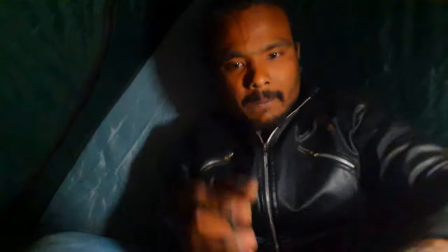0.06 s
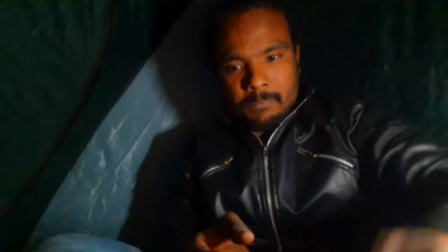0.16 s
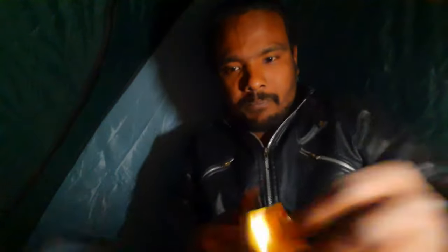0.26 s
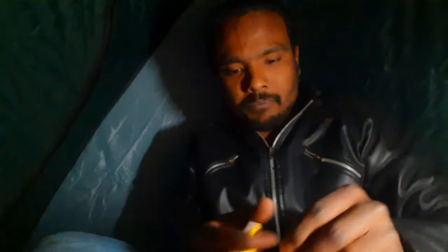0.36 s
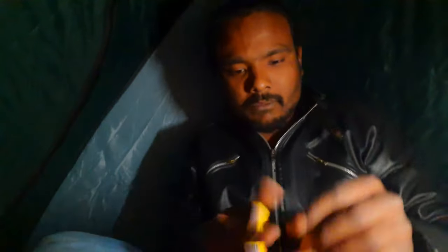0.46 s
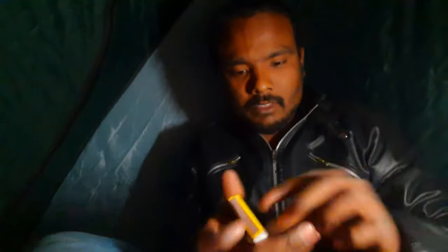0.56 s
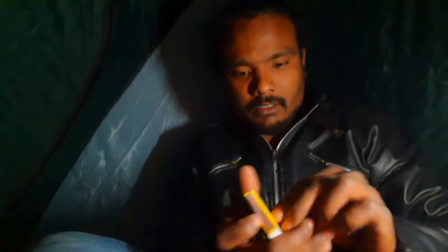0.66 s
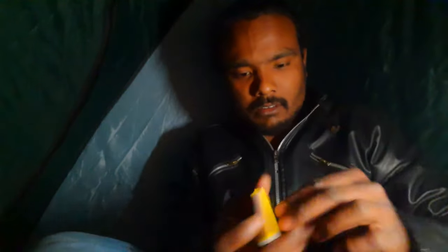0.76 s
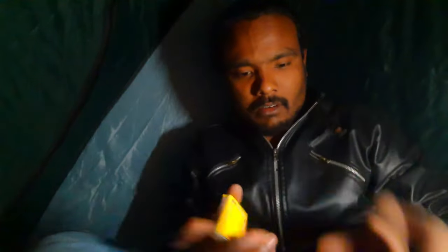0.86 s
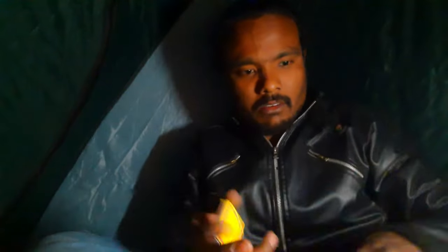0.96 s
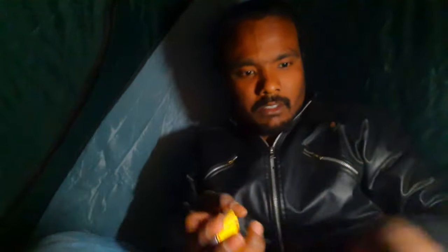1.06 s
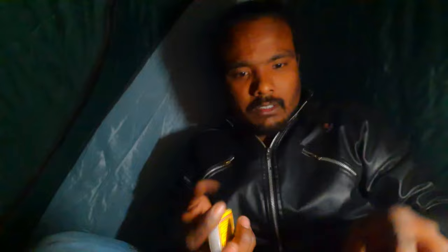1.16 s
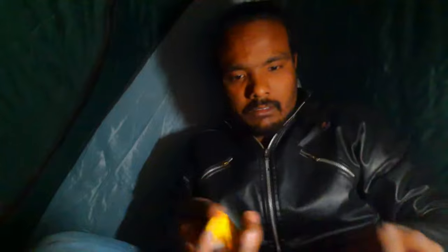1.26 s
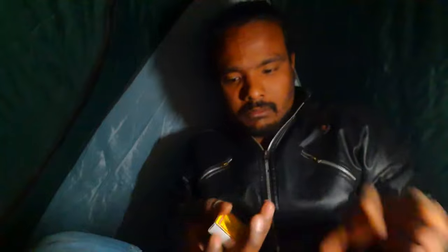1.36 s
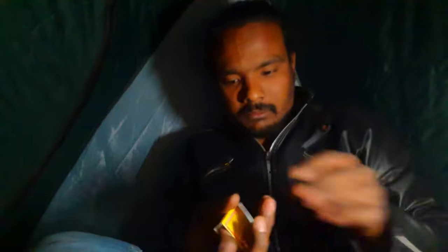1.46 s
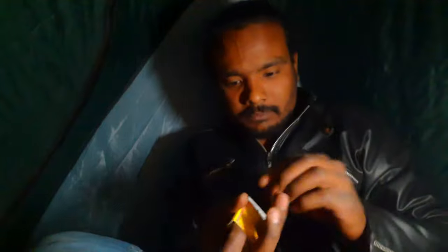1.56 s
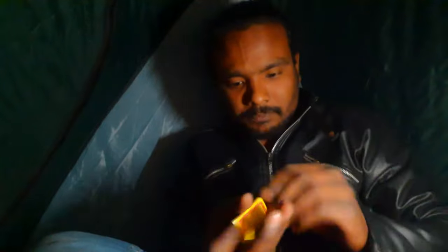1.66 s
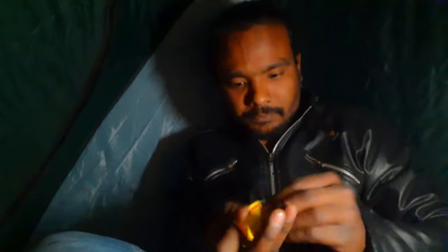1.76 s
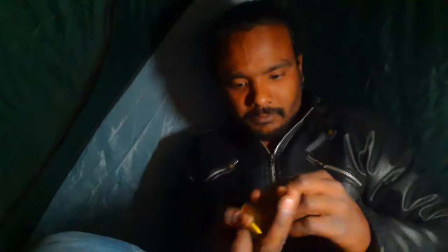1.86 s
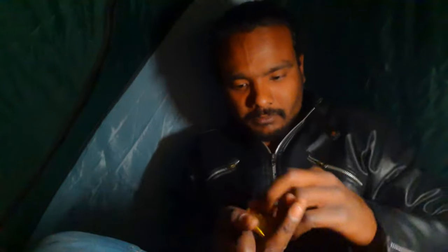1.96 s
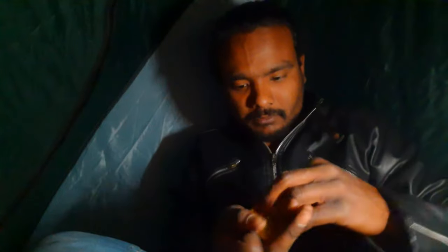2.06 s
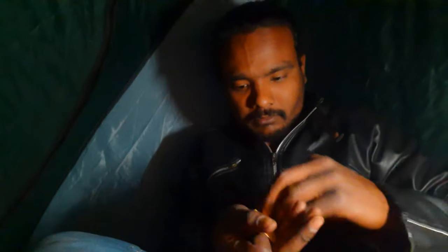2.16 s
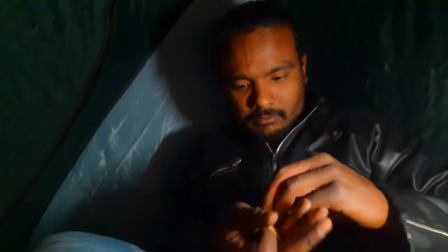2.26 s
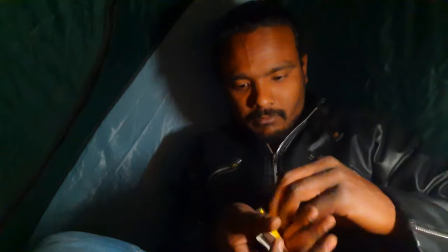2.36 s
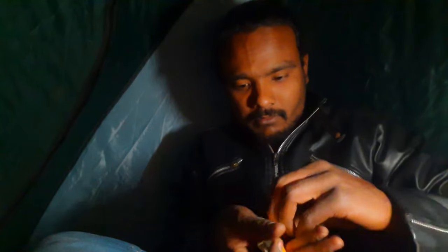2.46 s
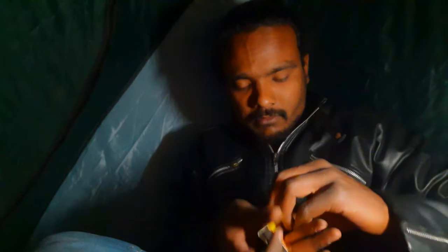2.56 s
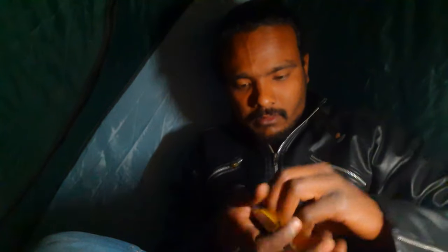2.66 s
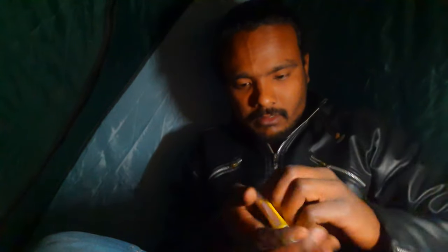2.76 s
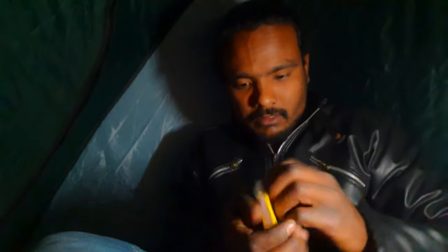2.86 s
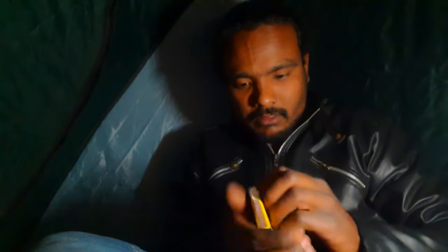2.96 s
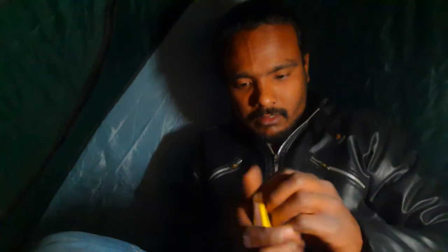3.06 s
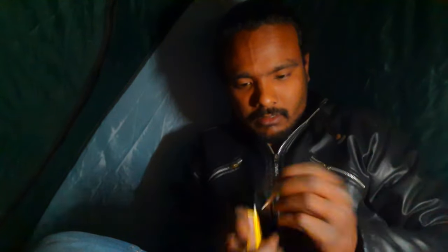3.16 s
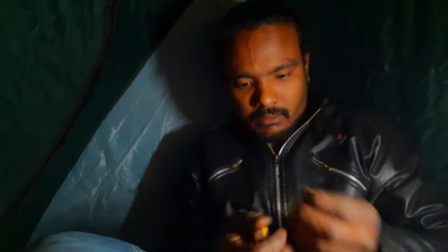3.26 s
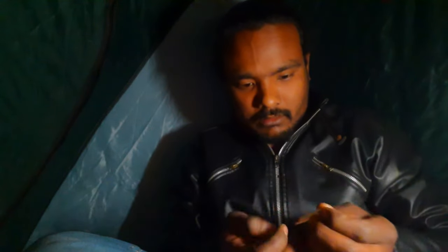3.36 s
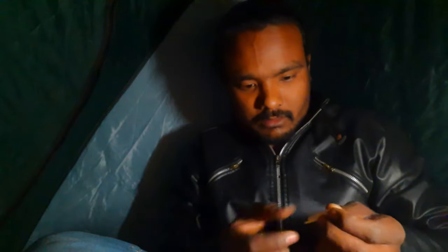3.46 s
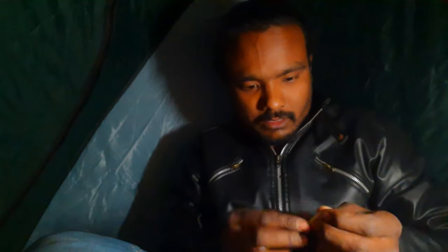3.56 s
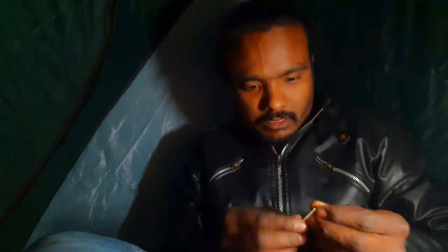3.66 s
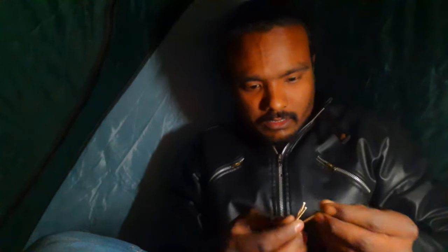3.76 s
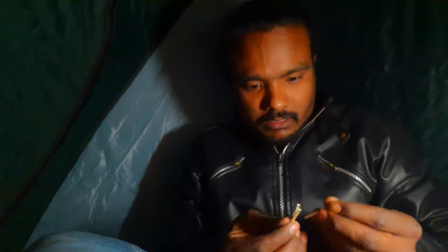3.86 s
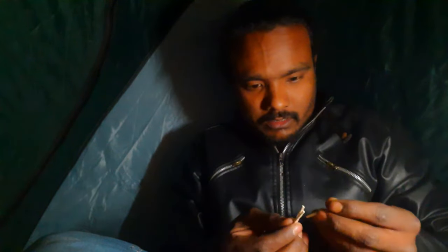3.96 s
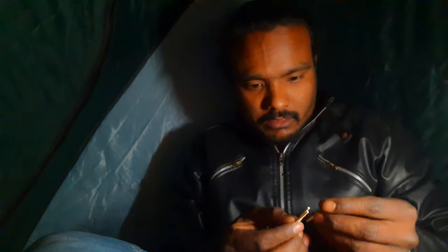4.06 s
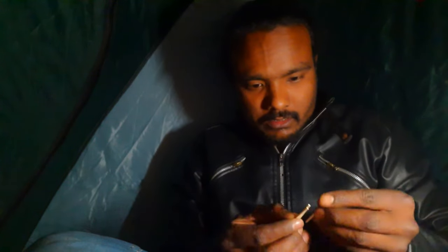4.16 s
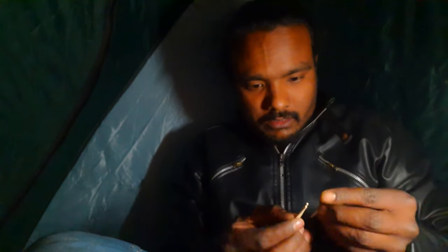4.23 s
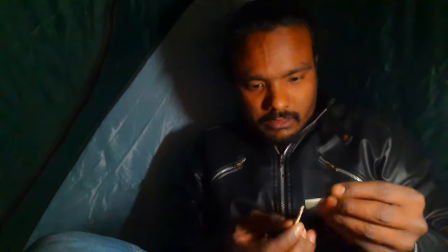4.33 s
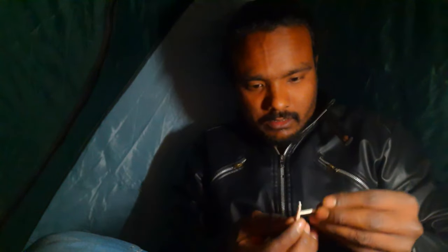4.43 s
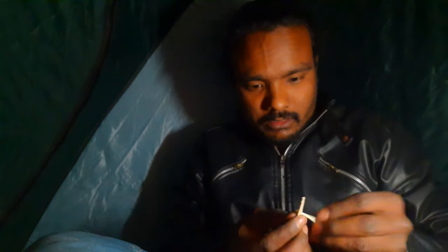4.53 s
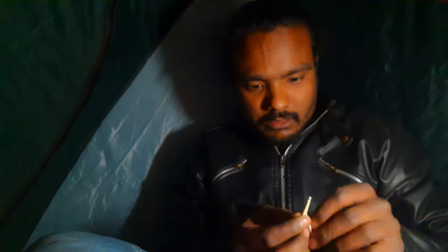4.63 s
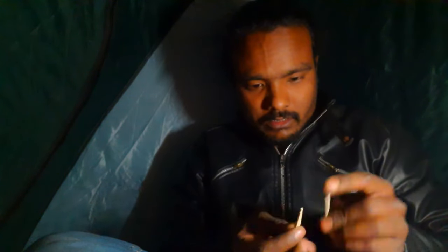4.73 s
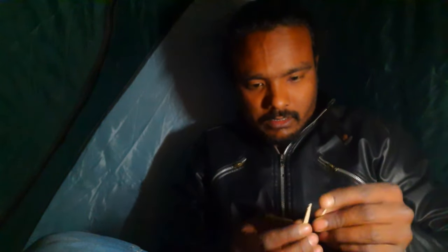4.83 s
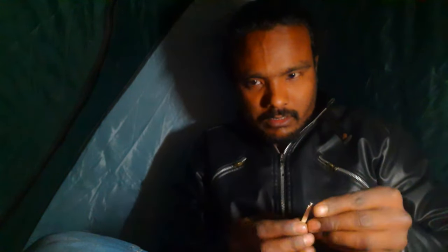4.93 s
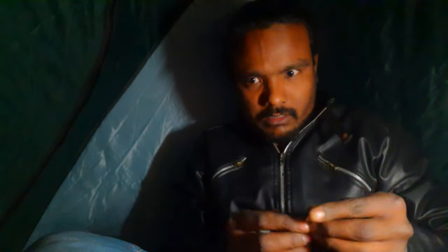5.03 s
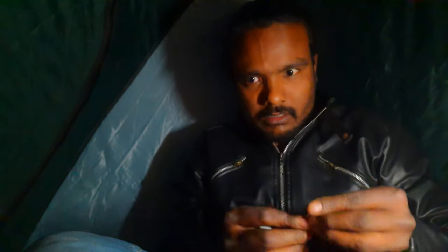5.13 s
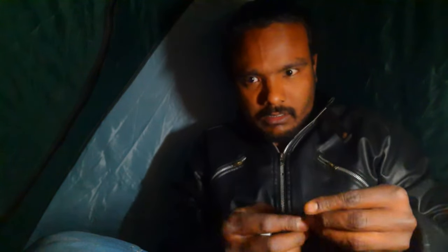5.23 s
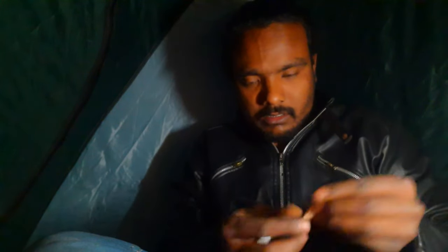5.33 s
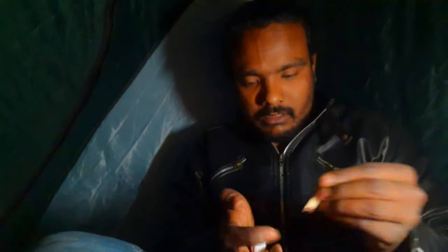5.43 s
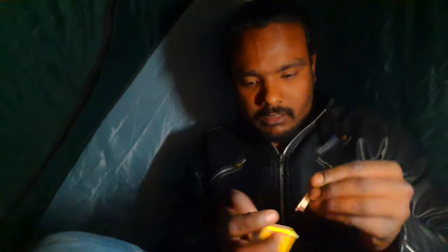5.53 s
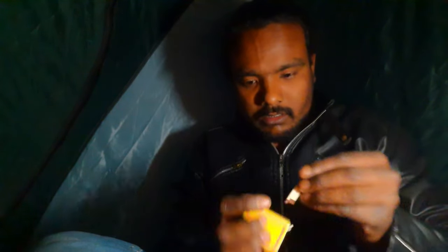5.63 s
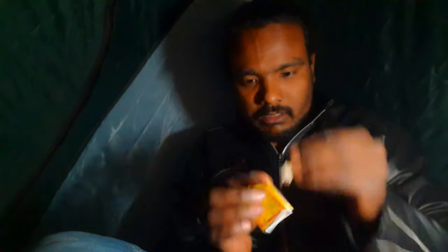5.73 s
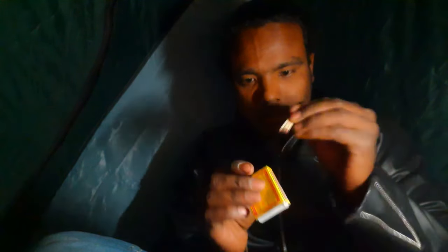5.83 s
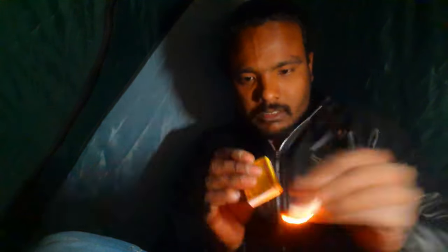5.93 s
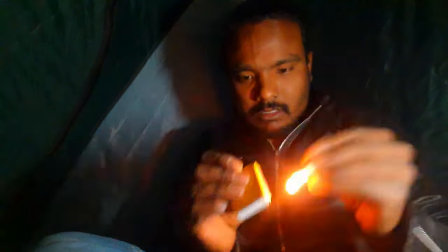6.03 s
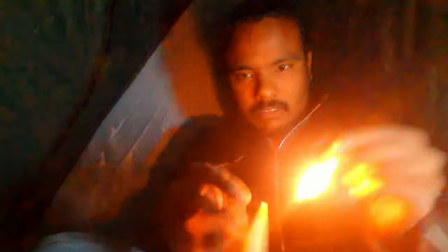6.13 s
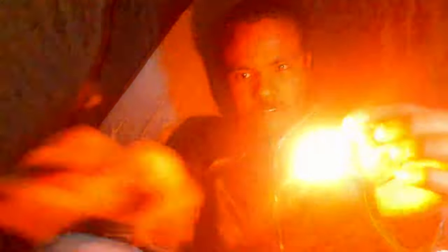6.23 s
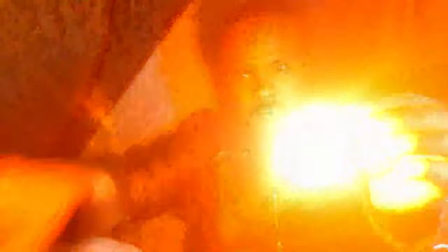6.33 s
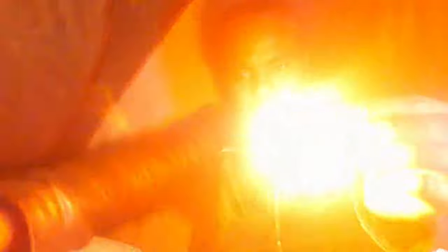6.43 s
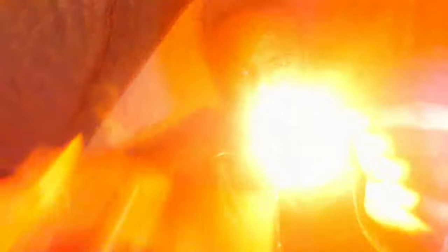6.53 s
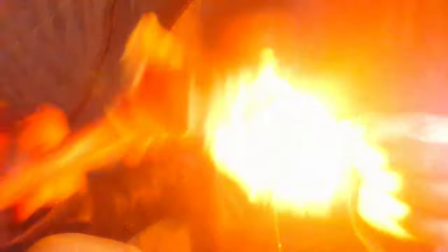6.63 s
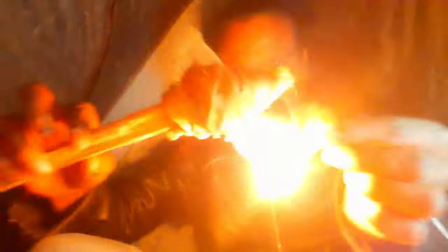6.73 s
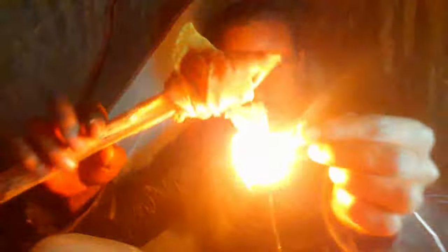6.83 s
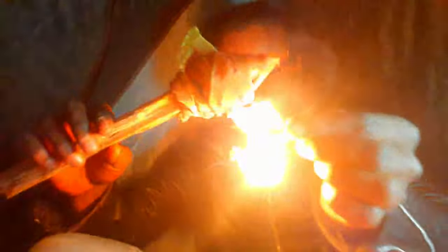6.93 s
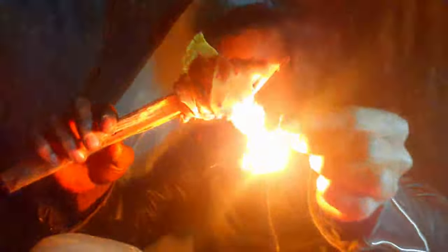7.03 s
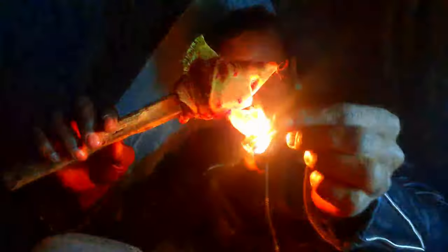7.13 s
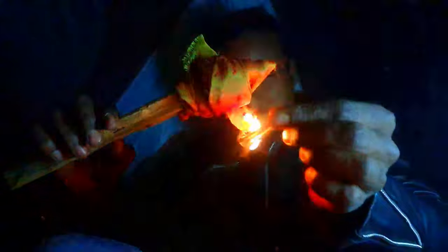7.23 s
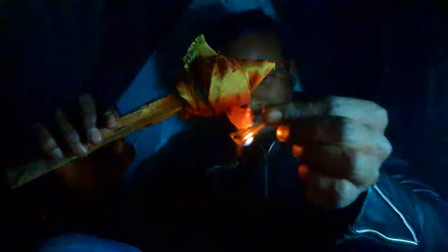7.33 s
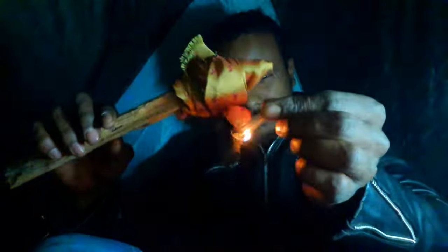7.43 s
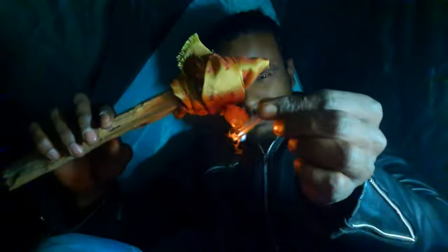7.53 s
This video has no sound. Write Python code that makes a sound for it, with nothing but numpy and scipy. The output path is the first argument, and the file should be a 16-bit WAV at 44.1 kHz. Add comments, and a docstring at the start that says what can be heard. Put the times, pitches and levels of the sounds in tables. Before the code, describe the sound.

Very close to a phone inside a small tent, hands fumble a cardboard matchbox: dry papery rustles, hollow taps, stick clicks and tray scrapes, with dull jacket rumble. After a near-silent pause with only faint low night air, the box is handled again, a match snaps along the striker and flares in an uneven hiss and soft roar, then cuts off into quiet.

```python
"""Matchbox in a tent at night

Inside a tent, hands close to a phone turn a cardboard matchbox and pick out matches.
Taps and scrapes are showers of tiny slips that ring the box; fingers and sleeves rustle as uneven noise.
A head is dragged along the striker and flares with a fluttering hiss and roar of shaped noise.
A low outdoor murmur of air lies under it all."""
import sys
import numpy as np
from scipy import signal
from scipy.fft import rfft, irfft, next_fast_len
from scipy.io import wavfile
from scipy.ndimage import uniform_filter1d

SR = 44100
rng = np.random.default_rng(int(sys.argv[2]) if len(sys.argv) > 2 else 0)


def store_wav(level_fs):
    """Save 16-bit WAV to argv[1]."""
    pcm = np.round(np.clip(np.atleast_2d(level_fs), -1, 1) * 32767)
    wavfile.write(sys.argv[1], SR, pcm.T.astype(np.int16))


N = 334719  # length in samples

SIDES = np.array([[1], [-1]])  # left and right port of the phone
# How alike nearby noise is at the two ports. Each row: frequency in Hz, likeness from 0 to 1.
NEAR_ALIKE = [(60, 0.73), (150, 0.98), (700, 0.87), (1500, 0.65), (4000, 0.31), (12000, 0.2)]
# The phone's case shades the treble. Each row: frequency in Hz, gain in dB.
CASE_SHADE = [(7900, -1), (9500, -19), (11000, -11.5), (15000, -8)]
# Hands in motion. Each row: time in seconds, level of fingers on card in dB, level of the jacket in dB,
# tightness of the grip from 0 to 1.
HANDS = [(0, -67.5, -63, .3), (0.15, -48, -42.5, .3), (0.45, -56, -54, .5), (0.56, -72, -63, .3),
         (0.9, -61, -61, .2), (1.05, -46.5, -46.5, .4), (1.3, -53.5, -56.5, .3), (1.5, -54.5, -46.5, .3),
         (1.7, -64, -57.5, .5), (2.0, -56.5, -60.5, .6), (2.3, -53, -58, .6), (2.6, -47, -70, .8),
         (2.9, -53, -56, .7), (3.3, -50, -57.5, .4), (3.6, -68.5, -69, .5), (3.9, -88, -80, .5),
         (5.4, -88, -80, .5), (5.55, -61, -75, .4), (5.96, -55.5, -76, .4)]


def undb(db):
    """Turns decibels into a plain gain."""
    return 10 ** (np.asarray(db) / 20)


def unit(x):
    """Scales a signal to rms 1."""
    return x / np.sqrt(np.mean(x ** 2))


def freqs(size):
    """Frequencies of a spectrum in Hz, kept at 1 or above."""
    return np.maximum(np.fft.rfftfreq(size, 1 / SR), 1.)


def on_log(table, hz):
    """Reads (Hz, value) points on a log-frequency axis."""
    f, v = np.transpose(table)
    return np.interp(np.log(hz), np.log(f), v)


def resonance(f, hz, width_hz):
    """Complex response of one damped mode, gain 1 at the centre."""
    return 1 / (1 + 1j * (f - hz * hz / f) / width_hz)


def curve(table):
    """Columns of timed rows at every sample; -200 (silent, for levels) outside the table."""
    t = np.arange(N) / SR
    s, *columns = np.transpose(table)
    return np.array([np.interp(t, s, c, -200, -200) for c in columns])


def walk(rate):
    """Random levels held 1 / rate seconds and smoothed twice; rms 1."""
    k = int(SR / rate)
    steps = np.repeat(rng.standard_normal(N // k + 1), k)
    return unit(uniform_filter1d(uniform_filter1d(steps, k), k)[:N])


def grains(shape, spread_db):
    """Dense tiny slips: noise in which a few slips are far larger than the rest."""
    return unit(rng.standard_normal(shape) * undb(spread_db * rng.exponential(size=shape)))


def wide_noise(spectrum, alike):
    """Coloured noise for two ports, as alike in each band as the table says."""
    size = next_fast_len(N)
    f = freqs(size)
    mid, side = rfft(rng.standard_normal((2, size)))
    c = np.clip(on_log(alike, f), 0, 1)
    pair = np.sqrt(1 + c) * mid + SIDES * np.sqrt(1 - c) * side
    return unit(irfft(pair * undb(on_log(spectrum, f)), size)[:, :N])


def through(x, response):
    """Filters a whole signal and sets it to rms 1."""
    size = next_fast_len(N)
    return unit(irfft(rfft(x, size) * response(freqs(size)), size)[..., :N])


def box(f, grip=0.97):
    """The card walls and hollow tray ring in several modes; a tighter grip raises them all."""
    # Each row: pitch in Hz before the grip scales it, width in Hz, strength in dB.
    modes = [(1274, 540, -13), (2220, 130, 7), (2684, 170, 1), (3376, 1350, -0.5), (5320, 500, -13.5),
             (8450, 610, -4)]
    response = 0
    for k, (hz, width_hz, db) in enumerate(modes):
        response = response + (-1) ** k * undb(db) * resonance(f, hz * grip, width_hz)
    return response


def treble(f, hz=8000):
    """The thin crackle of the contact itself: a broad bright hump."""
    return resonance(f, hz, 13000) ** 2


def night():
    """Distant air and the hiss of the phone: steady noise whose level drifts a little."""
    # Each row: frequency in Hz, strength in dB per Hz.
    spectrum = [(15, -43.5), (25, -18.5), (48, -4), (136, 0.5), (173, -9.5), (204, -4.5), (331, -5.5),
                (666, -22), (1490, -33), (1800, -32.5), (5730, -38.5), (7500, -34.5), (15500, -37.5)]
    # Each row: frequency in Hz, left-right likeness from 0 to 1.
    alike = [(60, 0.93), (200, 0.69), (700, 0), (3000, 0)]
    return wide_noise(spectrum, alike) * undb(-56.3 + 1.2 * walk(4.9))


def sleeves():
    """The jacket drags over itself with a dull, uneven rumble."""
    # Each row: frequency in Hz, strength in dB per Hz.
    spectrum = [(40, -7), (150, -9), (300, -2.5), (500, -7), (1000, -15.5), (4000, -52)]
    return wide_noise(spectrum, NEAR_ALIKE) * undb(curve(HANDS)[1] + 3.7 * walk(25))


def thumps():
    """A soft push through the floor rings one heavily damped low mode."""
    # Dull knocks. Each row: start in seconds, peak in dB, pitch in Hz, time to fade by 60 dB in seconds.
    knocks = [(1.168, -24.5, 85, 0.063), (1.389, -31.5, 46.4, 0.13), (1.459, -29.5, 114, 0.055),
              (2.161, -36, 430, 0.03), (3.238, -24.5, 420, 0.027), (5.981, -25.5, 356, 0.039),
              (6.32, -20, 61.9, 0.17)]
    out, t = np.zeros((2, N + SR)), np.arange(SR // 2) / SR
    for s, db, hz, t60 in knocks:
        # the lower the pitch, the further the two ports are out of step
        ring = np.sin(2 * np.pi * hz * t + SIDES * 40 / hz)
        fade = np.exp(-np.log(1000) * t / max(t60, .01))
        soft_start = 1 - np.exp(-t / 0.0042)
        ring *= fade * soft_start
        i = int(s * SR)
        out[:, i:i + len(t)] += undb(db) * ring / np.max(np.abs(ring))
    return out[:, :N]


def stirred():
    """Level of the fingers in dB: their steady motion plus rustle that lingers after each touch."""
    linger_db, settle_db_per_s = -25, 300  # level below the touch's peak, and how fast it dies
    t, power = np.arange(N) / SR, undb(curve(HANDS)[0]) ** 2
    for s, db, *_, breadth_db in touches():
        db -= max(breadth_db, 0)  # a bright crackle holds little of the box's own ring
        after = slice(int(s * SR), int((s + .3) * SR))
        power[after] += undb(db + linger_db - settle_db_per_s * (t[after] - s)) ** 2
    return 10 * np.log10(power)


def rustle():
    """Skin sticks and slips on the card in patches; the box rings with it as the grip shifts."""
    slips = grains((2, N), 2.7) * undb(2.5 * walk(60) + 3.5 * walk(350))
    shared = slips[0] + .5 * SIDES * slips[1]
    tight = np.clip(curve(HANDS)[2] + 0.4 * walk(11), 0, 1)
    loose_ring = through(shared * np.sqrt(1 - tight), box)
    tight_ring = through(shared * np.sqrt(tight), lambda f: box(f, 1.19))
    ring = (loose_ring + tight_ring) / np.sqrt(2)
    crackle = undb(1.5 + 1.7 * walk(15)) * through(slips, treble)
    return (ring + crackle) * undb(stirred())


def ticks():
    """A matchstick hits the tray once and rattles for a few milliseconds."""
    # Each row: start in seconds, peak in dB, ring in Hz.
    clicks = [(0.1245, -27.5, 2320), (0.1905, -24, 2180), (0.2857, -23, 1430), (0.4343, -15, 2620),
              (1.0296, -26.5, 3080), (2.361, -20, 2720), (2.611, -14, 2200), (2.658, -20, 2700),
              (3.024, -16, 2370), (3.0873, -25, 2490), (3.5469, -48, 4200), (5.4977, -33.5, 2330),
              (5.849, -41, 2090), (5.8738, -24, 2240), (5.8974, -29.5, 2650), (5.9724, -12, 4500),
              (5.9763, -1.5, 2440), (6.322, -24, 2640)]
    size = 2048
    out, t, f = np.zeros(N + size), np.arange(size) / SR, freqs(size)
    for slip, (s, db, hz) in zip(grains((len(clicks), size), 2.3), clicks):
        push = .3 * slip * np.exp(-t / 0.0014)
        push[0] += 2.5  # the first hit
        colour = 0.2 * box(f) + resonance(f, hz, 700) + 0.4 * treble(f)
        sound = irfft(rfft(push) * colour, size)
        i = int(s * SR)
        out[i:i + size] += undb(db) * sound / np.max(np.abs(sound))
    return out[:N]


def sputter(x):
    """Splits a sound into octave bands, each with its own flickering level."""
    bands = 250 * 2. ** np.arange(7)  # centres in Hz
    size = next_fast_len(N)
    whole, f = rfft(x, size), freqs(size)
    inside = np.clip(f, bands[0], bands[-1])
    out = 0
    for hz in bands:
        share = np.clip(1 - np.abs(np.log2(inside / hz)), 0, 1)
        out = out + irfft(whole * share, size)[:, :N] * undb(2.5 * walk(25))
    return out


def flare():
    """Gas jets hiss and spit from the head, the flame flutters below, a cupped hand hollows the hiss."""
    # The burning head. Each row: time in seconds, hiss level in dB, roar level in dB.
    levels = [(5.99, -33, -30), (6.025, -35, -41), (6.16, -32, -38), (6.25, -25, -32), (6.36, -27, -30),
              (6.47, -25, -31), (6.65, -33.5, -39), (6.83, -27.5, -30), (6.96, -30, -34),
              (7.05, -37.5, -44), (7.135, -36, -45), (7.158, -63, -52), (7.21, -80, -66)]
    # Both spectra, each row: frequency in Hz, strength in dB per Hz.
    hiss_spectrum = [(350, -17), (600, -9.5), (1200, -6.5), (2000, -7), (3200, -4.5), (6000, -8),
                     (7500, -5), (15000, -6.5)]
    roar_spectrum = [(15, -50.5), (25, -28), (64, -5.5), (135, 2.5), (177, -1.5), (356, 0), (750, -11),
                     (1200, -11), (1560, -16), (2640, -120)]
    hiss_db, roar_db = curve(levels)
    hiss = sputter(wide_noise(hiss_spectrum, NEAR_ALIKE))
    # the hand swallows a narrow band: open at -1, low band gone at 0, higher band gone at 1
    closing = np.interp(np.arange(N) / SR, (6.3, 6.5, 7.1), (-1, 0, 1))
    low_gone, high_gone = [through(hiss, lambda f: 1 - resonance(f, hz, 350)) for hz in (1850, 2150)]
    cupped = low_gone + np.clip(closing, 0, 1) * (high_gone - low_gone)
    hiss = cupped + np.clip(-closing, 0, 1) * (hiss - cupped)
    roar = wide_noise(roar_spectrum, NEAR_ALIKE)
    flutter = walk(30)  # shared by hiss and roar
    hiss_gain = undb(hiss_db + 0.93 * flutter + 1.4 * walk(250))
    roar_gain = undb(roar_db + 0.54 * flutter + 1.7 * walk(12) + 2.0 * walk(70))
    return hiss * hiss_gain + roar * roar_gain


def touches():
    """Every touch as (peak s, dB, rise s, fall s, ring Hz, breadth dB); all taps rise alike."""
    # Breadth is how far crackle and thud stand over the ring; rise and fall are times over 20 dB.
    # Abrupt touches on the box. Each row: peak time in seconds, peak rms level in dB,
    # fall in seconds (below 0.001, even negative, counts as 0.001), ring in Hz, breadth in dB.
    taps = [(0.287, -23.5, 0.06, 1460, -0.5), (0.380, -25, 0.014, 3600, -6),
            (0.7188, -41.5, 0.1, 1560, -10), (0.802, -41, 0, 1920, -19), (0.8395, -33, 0.04, 1860, -8),
            (1.166, -33, -0.05, 2170, 4), (1.1839, -26.5, 0.0079, 3000, -1), (1.56, -47, -0.04, 2550, -15),
            (1.7915, -35.5, -0.4, 2700, -8), (2.164, -35, 0, 3180, 6), (2.224, -42, -0.2, 2790, -4),
            (2.2673, -38, 0.2, 3400, -1.5), (2.403, -22, 0, 2670, -3), (2.4822, -10, -0.03, 2800, -12),
            (2.8208, -20.5, -0.06, 2660, -6.5), (2.844, -39.5, 0.3, 2730, -6.5),
            (2.8925, -26, 0.011, 2230, -10), (3.1931, -18.5, 0.03, 2030, -0.5),
            (4.647, -60.5, 0.02, 900, -10), (4.721, -64, 0.01, 1000, -10), (5.4059, -33, -0.02, 1090, 32),
            (5.4789, -50.5, 0.04, 2730, -1), (5.704, -38, -0.1, 2080, -8), (5.718, -33.5, 0.04, 1600, -5.5),
            (5.950, -40.5, -0.2, 2220, -9.5), (6.1905, -25, 0.01, 2440, -10), (6.323, -21, 0.022, 2270, -1),
            (7.3176, -52.5, 0.0048, 3080, 21)]
    # Scrapes, slides of the tray and the strike. Each row: peak time in seconds, peak rms level in dB,
    # rise in seconds, fall in seconds, ring in Hz, breadth in dB.
    scrapes = [(0.1474, -39, 0.018, 0.032, 2130, -2), (0.3359, -22, 0.017, 0.011, 2400, -2),
               (0.4433, -23.5, 0.016, 0.045, 2580, 1.5), (0.497, -40.5, 0.015, 0.046, 1200, -3.5),
               (0.6545, -45, 0.061, 0.027, 1870, -9), (0.692, -37, 0.006, 0.024, 1630, 2),
               (0.7412, -40, 0.017, 0.028, 2040, -1), (0.764, -38, 0.012, 0.062, 2460, -1),
               (0.875, -45.5, 0.032, 0.017, 2300, 0), (1.052, -31.5, 0.012, 0.029, 3000, 5),
               (1.1105, -37, 0.022, 0.016, 2310, -9), (1.24, -43.5, 0.092, 0.05, 2200, 3),
               (1.3444, -36, 0.031, 0.088, 2200, -0.5), (1.4006, -35.5, 0.011, 0.031, 2020, 3.5),
               (1.4546, -31.5, 0.0078, 0.027, 2420, 8), (1.5128, -36.5, 0.039, 0.033, 2000, 4),
               (1.6598, -43, 0.04, 0.025, 2580, -3), (1.6931, -42.5, 0.012, 0.0082, 2630, -16),
               (1.7738, -40.5, 0.027, 0.026, 2240, -7), (1.8543, -34, 0.052, 0.045, 2170, -2.5),
               (1.922, -43.5, 0.043, 0.015, 2570, -10), (2.0517, -38.5, 0.01, 0.016, 3130, 2),
               (2.1145, -38.5, 0.024, 0.085, 2830, 0.5), (2.3117, -30.5, 0.031, 0.0039, 2580, -1),
               (2.3816, -33, 0.021, 0.0051, 2680, -4.5), (2.472, -34, 0.02, 0.02, 2700, -3),
               (2.5436, -26, 0.0072, 0.0066, 2680, -6), (2.5639, -26, 0.027, 0.03, 3080, -6),
               (2.6623, -24.5, 0.032, 0.029, 2640, 1.5), (2.7288, -26.5, 0.034, 0.044, 2230, -5),
               (2.93, -34, 0.047, 0.13, 2600, -0.5), (3.0044, -33, 0.085, 0.0054, 2530, -1),
               (3.037, -24, 0.033, 0.0088, 2370, -5), (3.1112, -29.5, 0.055, 0.013, 2650, -2.5),
               (3.1552, -24.5, 0.0097, 0.088, 3500, 0), (3.2081, -20.5, 0.006, 0.047, 2010, -0.5),
               (3.2445, -20, 0.01, 0.005, 2060, 0), (3.409, -37.5, 0.043, 0.0071, 1900, -7),
               (3.4764, -34, 0.051, 0.013, 2780, -8), (3.6589, -51.5, 0.028, 0.045, 2020, 1),
               (3.7647, -49.5, 0.03, 0.03, 2670, 21), (4.7557, -63, 0.043, 0.017, 7500, 0),
               (5.5802, -31.5, 0.013, 0.0052, 2090, -7), (5.6268, -32.5, 0.035, 0.012, 3320, -2),
               (5.685, -40.5, 0.065, 0.021, 2300, -6), (5.761, -36.5, 0.038, 0.033, 2850, -6),
               (5.84, -31.5, 0.025, 0.02, 2590, -10), (5.9898, -15, 0.019, 0.016, 2100, 0.5)]
    tap_rise_s = 0.0035
    return [(s, db, tap_rise_s, *rest) for s, db, *rest in taps] + list(scrapes)


def contacts():
    """Each touch is a shower of slips that swells and dies, ringing box and grip; abrupt ones tick first."""
    size, lead = 8192, 3000  # samples per touch, and samples before its peak
    out, t, f = np.zeros((2, N + size)), (np.arange(size) - lead) / SR, freqs(size)
    rows = touches()
    # the hands are never twice in the same place
    slips, place = grains((len(rows), size), 3.34), rng.standard_normal((len(rows), 2))
    # the slips come in clumps a few milliseconds long
    clumps = np.repeat(rng.standard_normal((len(rows), size // 64)), 64, axis=1)
    slips *= undb(5 * uniform_filter1d(clumps, 192))
    for slip, (pan, spot), (s, db, rise, fall, hz, breadth_db) in zip(slips, place, rows):
        # the thud grows with breadth up to a ceiling
        thud_db = min(-10 + 1.1 * breadth_db, 3)
        if 1.55 < s < 2.95:
            thud_db -= 3  # fingertips among the sticks in the open tray thud less
        apart = np.where(t < 0, -t / max(rise, 2e-4), t / max(fall, 1e-3))
        # a scrape holds near its top and then lets go
        push = slip * undb(-20 * apart ** np.where(t < 0, 1.8, 1.2))
        push[lead - int(.0012 * SR)] += 18 * np.exp(-rise / 0.0025)  # starting tick
        body = 0.62 * box(f, 1 + 0.063 * spot) + resonance(f, hz, 550)  # box plus the grip's own ring
        # broader contacts have a higher crackle
        crackle = treble(f, 8000 * undb(np.clip(0.13 * breadth_db, -1, 4)))
        thud = resonance(f, 600, 900)
        colour = body + undb(breadth_db - 5.5) * crackle + undb(thud_db) * thud
        lag = 1.83 + 2.13 * spot  # samples by which the right port hears it later
        delay = np.exp(1j * np.pi * SIDES * f * lag / SR)
        sound = irfft(rfft(push) * colour * delay, size) * undb(SIDES * 2.1 * pan)
        # the level is set by the loudest 4 ms as heard behind the case
        heard = irfft(rfft(sound) * undb(on_log(CASE_SHADE, f)), size)
        loudest = np.max(uniform_filter1d(np.mean(heard ** 2, axis=0), int(.004 * SR)))
        i = int(s * SR)
        out[:, i:i + size] += sound * undb(db) / np.sqrt(loudest)
    return out[:, lead:N + lead]


def tent(x):
    """Near cloth walls and the body send back a short wash, different at each port."""
    t60_s, wash_db = .028, -6  # time to fade by 60 dB; wash energy against the direct sound
    t = np.arange(int(.06 * SR)) / SR
    wash = rng.standard_normal((2, len(t))) * np.exp(-np.log(1000) * t / t60_s) * (t > .0006)
    wash *= undb(wash_db) / np.sqrt(np.sum(wash ** 2, axis=1, keepdims=True))
    wash[:, 0] = 1  # the direct sound
    return signal.fftconvolve(x, wash, axes=1)[:, :N]


def scene():
    """Sums the near sounds, colours them by case and ports, and lays the night under them."""
    # Balance of the ports. Each row: frequency in Hz, left minus right in dB.
    port_balance = [(40, 10), (120, 2.5), (300, 0), (1300, 3.5), (2400, 6.5), (4400, -2.5), (9000, 5),
                    (15000, 7)]
    size = next_fast_len(N)
    f = freqs(size)
    near = tent(contacts() + ticks() + rustle()) + sleeves() + thumps() + flare()
    phone = undb(on_log(CASE_SHADE, f) + SIDES * on_log(port_balance, f) / 2)
    return irfft(rfft(near, size) * phone, size)[:, :N] + night()


def record(dry):
    """The phone drops the deepest bass, clips loud peaks and cuts the top."""
    no_bass = signal.sosfilt(signal.butter(3, 42, "high", fs=SR, output="sos"), dry)
    clipped = np.clip(no_bass, -.94, .94)
    return signal.sosfilt(signal.ellip(10, .2, 70, 15500, fs=SR, output="sos"), clipped)


dry = scene()
out = record(dry)
store_wav(out)
```